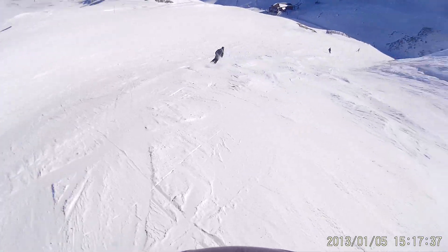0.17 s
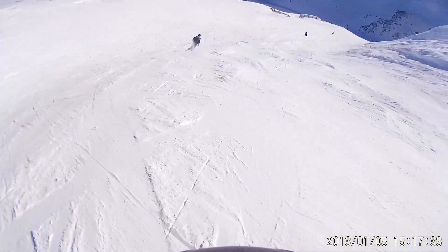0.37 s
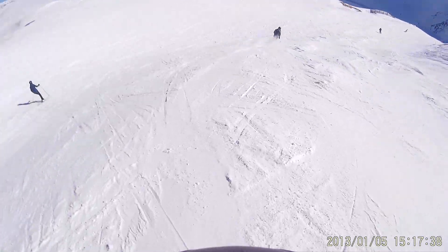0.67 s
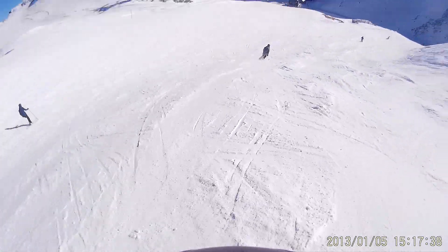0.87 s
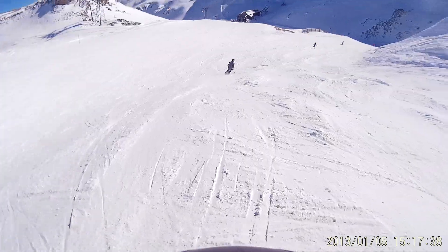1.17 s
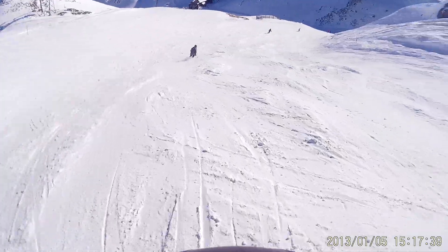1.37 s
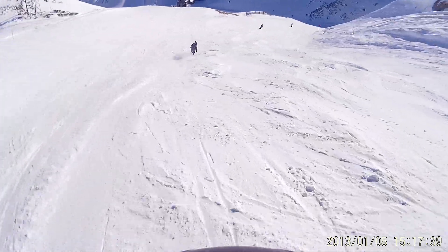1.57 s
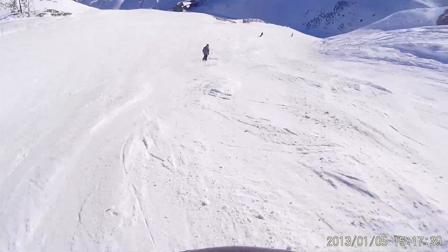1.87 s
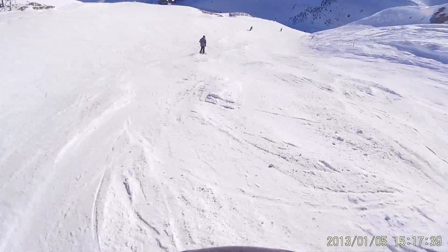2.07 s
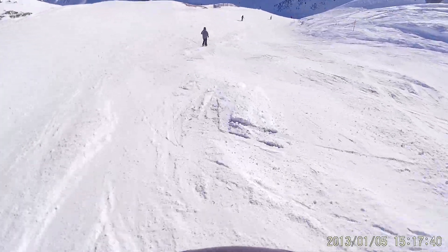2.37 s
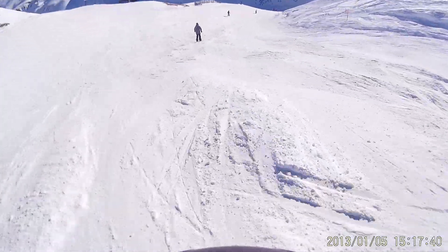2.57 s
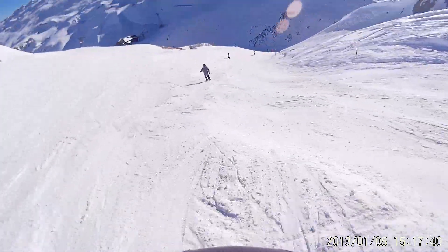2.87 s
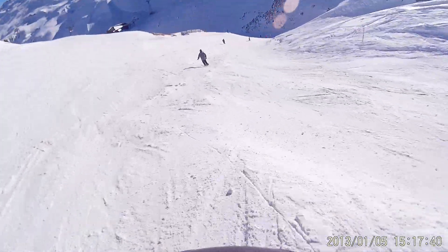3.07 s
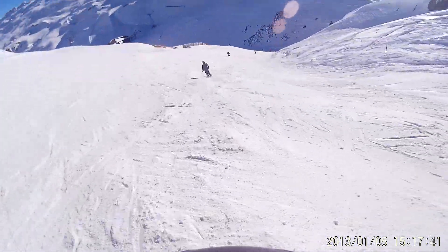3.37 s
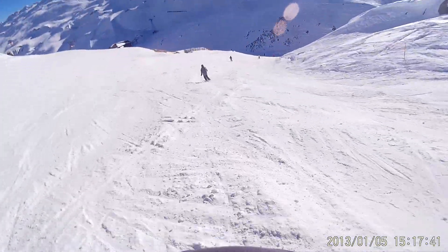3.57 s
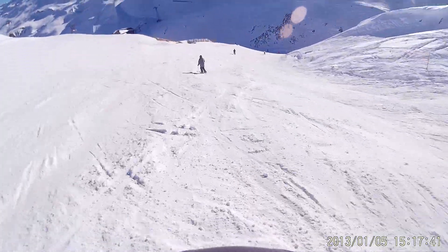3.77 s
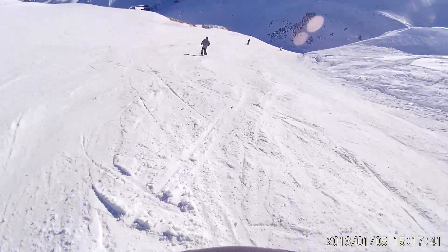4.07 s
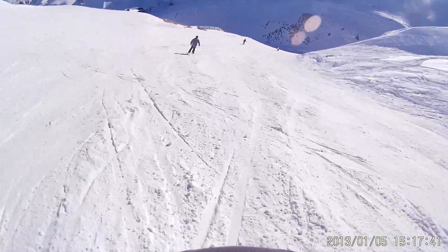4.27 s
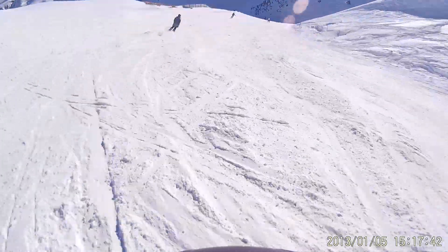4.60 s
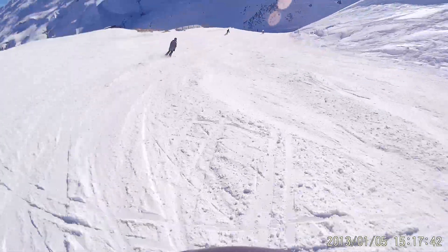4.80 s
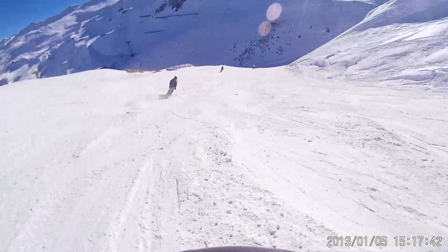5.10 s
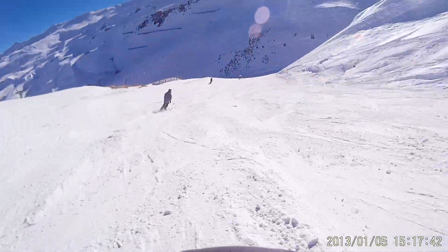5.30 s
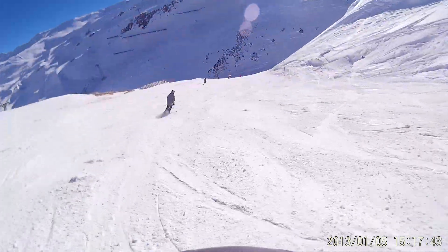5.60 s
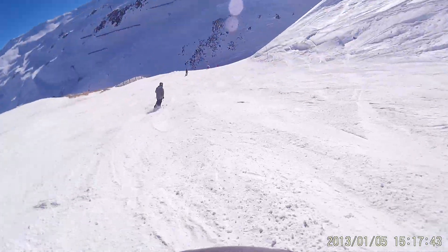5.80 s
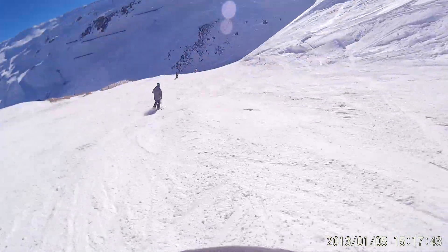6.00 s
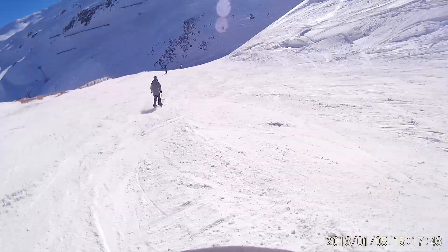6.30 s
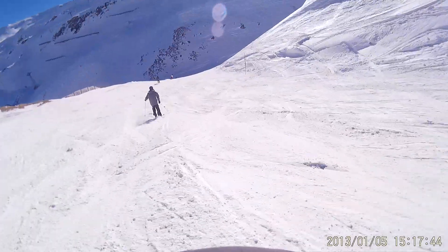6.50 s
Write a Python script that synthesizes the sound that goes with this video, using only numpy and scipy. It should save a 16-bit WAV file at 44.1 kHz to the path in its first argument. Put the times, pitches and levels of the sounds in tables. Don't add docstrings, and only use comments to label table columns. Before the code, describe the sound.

Skis gather speed on hard snow: near-quiet hiss and soft wind swell into harsh grainy scraping, low wind buffeting and sharp clicks from a plastic housing.

```python
import sys
import numpy as np
from scipy import signal
from scipy.fft import rfft, irfft
from scipy.io import wavfile
from scipy.ndimage import uniform_filter1d

SR = 44100
rng = np.random.default_rng(int(sys.argv[2]) if len(sys.argv) > 2 else 0)


def makeup_ratio(level_db):
    decades = np.asarray(level_db, float) / 20
    return 10 ** decades


def bounce(signal):
    frames = np.transpose(np.atleast_2d(signal))
    limited = np.clip(frames, -1, 1)
    pcm = np.round(limited * 32767).astype(np.int16)
    wavfile.write(sys.argv[1], SR, pcm)


N = 293265


def unit_rms(x):
    return x / np.sqrt(np.mean(x ** 2))


def coloured(points):
    hz, db = np.transpose(points)
    bins = np.maximum(np.arange(N // 2 + 1) * SR / N, 1)
    gain = makeup_ratio(np.interp(np.log(bins), np.log(hz), db))
    return unit_rms(irfft(rfft(rng.standard_normal(N)) * gain, N))


def walk(rate):
    hold = int(SR / rate)
    steps = np.repeat(rng.standard_normal(N // hold + 1), hold)
    return unit_rms(uniform_filter1d(uniform_filter1d(steps, hold), hold)[:N])


def ring(drives, modes, skirt=1):
    out = 0
    for k, (drive, (hz, width, db)) in enumerate(zip(drives, modes)):
        peak = signal.iirpeak(hz, hz / width, SR)
        band = signal.iirpeak(hz, hz / width / skirt, SR)
        rung = signal.lfilter(*band, signal.lfilter(*peak, drive))
        out = out + (-1) ** k * makeup_ratio(db) * rung
    return out


def humps(events, column=2):
    out = np.zeros(N)
    for event in events:
        centre, length = event[:2]
        first = max(int((centre - length / 2) * SR), 0)
        last = min(int((centre + length / 2) * SR), N)
        i = np.arange(first, last)
        out[i] += event[column] * np.cos(np.pi * (i / SR - centre) / length) ** 2
    return out


def swells(events, column):
    heights = [(e[0], e[1], makeup_ratio(e[column])) for e in events]
    return 20 * np.log10(humps(heights) + 1e-6)


def summed(*levels_db):
    return 10 * np.log10(sum(makeup_ratio(db) ** 2 for db in levels_db))


# time in seconds, load in dB.
LOAD = [(0, -73.5), (.3, -68.5), (.46, -77), (1.3, -65), (2.0, -62), (2.75, -52.5), (3.3, -43.5),
        (3.98, -42.5), (4.3, -35), (4.85, -37), (5.03, -43), (5.16, -35), (5.5, -32.5), (5.74, -32),
        (5.9, -41), (6.0, -34), (6.25, -33), (6.65, -38)]


def smooth_load():
    s, db = np.transpose(LOAD)
    return np.interp(np.arange(N) / SR, s, db)


# centre in seconds, length in seconds, level in dB re load.
PATCHES = [(.6, 0.14, 16.5), (.97, 0.18, 13.5), (1.14, .14, 7.5), (1.79, 0.088, 2), (2.19, 0.13, 3),
           (2.33, 0.18, 3.5), (2.47, 0.13, 5.5), (2.58, 0.19, 8), (3.25, 0.057, 1), (3.6, 0.22, 1.5),
           (3.7, 0.094, -3.5), (3.84, 0.12, 2), (4.08, 0.073, -0.5), (4.4, 0.071, 1.5), (4.54, 0.19, -3.5),
           (4.66, 0.2, 1), (4.76, .1, 1), (5.27, 0.33, -2), (5.52, .1, 1.5), (5.6, 0.056, -1),
           (6.08, 0.15, -1.5), (6.35, 0.098, -1.5), (6.5, 0.24, -1.5), (6.57, 0.044, 4)]


def load():
    return smooth_load() + humps(PATCHES)


PIVOT_DB = -38


def law(db, slope):
    return db + slope * (load() - PIVOT_DB)


# centre in seconds, length in seconds, scrape level in dB.
SCUFFS = [
    (.1, 0.96, -69.5),
    (.66, 0.47, -60),
    (.9, 0.22, -51),
    (.97, 0.14, -49.5),
    (1.13, 0.34, -55),
    (1.04, .2, -59.5),
    (1.5, 0.31, -63),
    (2.52, 0.17, -54),
]


def scuffing():
    return swells(SCUFFS, column=2)


# centre in seconds, length in seconds, buffet in dB, helmet shake in dB.
GUSTS = [(.14, 0.6, -44.5, -62), (.58, 0.18, -63, -52.5), (.67, 0.1, -47, -49), (.9, 0.21, -55, -41.5),
         (1.12, 0.21, -40.5, -45), (1.75, 0.17, -44.5, -54), (1.86, 0.25, -46.5, -55.5),
         (2.22, 0.23, -50, -53), (2.47, 0.22, -42.5, -53), (2.62, 0.28, -48, -59), (2.81, 0.11, -52, -66),
         (2.95, .14, -50, -53), (3.21, .14, -40, -56), (3.38, 0.24, -44, -50.5), (3.72, .14, -48, -50),
         (3.86, 0.2, -39, -56), (4.08, 0.26, -47, -42), (4.35, .2, -43, -56), (4.57, .14, -28.5, -47),
         (4.69, 0.2, -36, -47), (4.9, 0.23, -37, -51), (5.11, 0.13, -38, -49), (5.25, 0.13, -53, -45),
         (5.42, 0.22, -38, -47), (5.5, 0.12, -27, -44), (5.72, 0.14, -24.5, -40), (5.97, .16, -31, -44),
         (6.22, 0.28, -22.5, -37.5), (6.4, 0.27, -30, -45.5), (6.58, 0.13, -36, -55)]


def buffet():
    calm_db = -44 + 0.37 * (smooth_load() - PIVOT_DB)
    return 2.0 + summed(calm_db, swells(GUSTS, column=2))


def tones(lines):
    t = np.arange(N) / SR
    return sum(np.sqrt(2) * makeup_ratio(db) * np.sin(2 * np.pi * (hz * t + rng.random())) for hz, db in lines)


# frequency in Hz, density in dB per Hz.
HISS_COLOUR = [(300, 16), (2000, 3.5), (5000, 0), (6600, -1.5), (8800, 1), (9900, 0.5), (10600, 7),
               (11300, -0.5), (13800, -1), (14600, 4.5), (15100, 1), (15800, -6), (16500, -3)]
# frequency in Hz, level in dB.
CLOCK = [(9265, -80), (9337, -79), (9410, -76), (9483, -69.5), (9555.6, -70), (9628, -79)]
# frequency in Hz, level in dB.
WHINE = [(8387, -74), (9084, -71), (9783, -71), (10395, -72), (10482, -63), (10568, -65), (11090, -75),
         (11181, -65), (14589, -70), (14674.5, -60), (15373, -68)]


def electronics():
    floor_db = -48
    loudness_db = summed(load() + 4, scuffing(), buffet() - 3, floor_db)
    hiss_db = -67.5 + 0.58 * (loudness_db + 34)
    flicker_db = 1.06 * walk(45)
    hiss = makeup_ratio(hiss_db + flicker_db + 11.0) * coloured(HISS_COLOUR)

    start_s, length_s, period_s = 0.13, 0.19, 1.0
    busy = (np.arange(N) / SR - start_s) % period_s < length_s
    busy = uniform_filter1d(busy * 1., size=600)
    swell_db = hiss_db + 60
    clock = makeup_ratio(1.05 * swell_db + 2.5) * tones(CLOCK)
    whine_db = 0.83 * swell_db + flicker_db + 1.6 * walk(40) + 0.5
    whine = busy * makeup_ratio(whine_db) * tones(WHINE)
    noisier = makeup_ratio(1.5 * busy)
    return noisier * hiss + clock + whine


# frequency in Hz, density in dB per Hz.
BUFFET = [(2, -43), (5, 2), (12, 4.5), (22, -5), (32, -9.5), (45, -28), (70, -51), (150, -97)]
# frequency in Hz, density in dB per Hz.
HELMET = [(35, -15.5), (50, -4.5), (64, 2), (85, -7), (110, -16.5), (200, -64)]
# frequency in Hz, density in dB per Hz.
STRAP = [(70, -21), (105, -5), (140, 1), (200, -5), (300, -13), (500, -10.5), (1500, -92)]


def wind():
    shake_db = swells(GUSTS, column=3)
    helmet_db = summed(law(-52.5, 0.42), shake_db)
    strap_db = summed(law(-47.5, 0.62), shake_db - 14)
    shaken = makeup_ratio(helmet_db) * coloured(HELMET) + makeup_ratio(strap_db) * coloured(STRAP)
    pressure = makeup_ratio(buffet()) * coloured(BUFFET)
    return makeup_ratio(0.44 * walk(11)) * (pressure + shaken)


# frequency in Hz, width in Hz, level in dB.
STRUCK = [
    [(1558, 208, 7.5), (1460, 330, -6.5)],
    [(2330, 226, 4), (2880, 194, 0)],
    [(3454, 200, 7), (4190, 470, -8)],
    [(5170, 220, 2.5), (5760, 380, -6)],
    [(7230, 290, 5.5), (8900, 820, -6), (10800, 1400, -7), (11900, 1500, -13), (15200, 1900, -13)],
    [(690, 140, 3), (400, 410, 2), (990, 190, -8)],
]


def mount(events, slips, spacing_s, fade, crack_db, thud_db, cavity_db, seal_db, damping):
    out = np.zeros(N)
    chance = rng.random((len(events), 2 * slips))
    for (s, peak_db, door_db, lens_db), draw in zip(events, chance):
        gaps = spacing_s * SR * (.5 + draw[:slips])
        at = np.cumsum(gaps) - gaps[0]
        push = np.zeros(2048)
        np.add.at(push, at.astype(int), (.5 + draw[slips:]) * (-fade) ** np.arange(slips))
        seal_share_db = lens_db + seal_db
        shares_db = [cavity_db, door_db, lens_db, seal_share_db, seal_share_db + crack_db, cavity_db + thud_db]
        sound = 0
        for share_db, modes in zip(shares_db, STRUCK):
            damped = [(hz, damping * width, db) for hz, width, db in modes]
            part = ring([push] * len(modes), damped, skirt=2.3)
            sound = sound + makeup_ratio(share_db) * part / np.abs(part).max()
        i = int(s * SR)
        out[i:i + len(push)] += makeup_ratio(peak_db + 4) * sound[:N - i]
    return out


# start in seconds, peak in dB, door in dB re peak, lens in dB re peak.
TICKS = [(1.3744, -53, -6, -12), (2.085, -43, -20, -26), (2.1813, -55, -4, -3), (2.3484, -55, -2, -12),
         (3.2066, -15.5, -17.5, -14), (3.3963, -37.5, -5, -7.5), (3.7814, -17, -17, -13.5),
         (4.0131, -17, -18, -14.5), (5.0774, -16.5, -18, -13), (5.457, -20.5, -19, -13),
         (5.475, -33, 1, -12), (5.61, -19, -18, -17), (5.9383, -22.5, -8, -28), (5.9539, -19.5, -18.5, -14),
         (6.0906, -17.5, -17.5, -17), (6.2741, -16, -16, -13.5), (6.3695, -16.5, -15.5, -14.5),
         (6.4793, -20, -22, -25), (6.5685, -26, -15, -19), (6.58, -21, -12, -24.5)]


def ticks():
    return mount(TICKS, slips=1, spacing_s=.0003, fade=0.57, crack_db=-4, thud_db=-17,
                 cavity_db=-6, seal_db=-9, damping=1.0)


# start in seconds, peak in dB, door in dB re peak, lens in dB re peak.
SNAPS = [
    (2.596, -39, -2, -8.5),
    (3.0789, -32.5, -5, -6),
    (4.54, -28, -16, -4),
    (4.6095, -18.5, -9.5, -8),
    (6.3345, -29, -4, -7.5),
    (6.391, -30, -23, -11),
]


def snaps():
    return mount(SNAPS, slips=6, spacing_s=0.00043, fade=0.7, crack_db=-1, thud_db=-22,
                 cavity_db=-7, seal_db=-6, damping=1.7)


# start in seconds, peak in dB, door in dB re peak, lens in dB re peak.
KNOCKS = [
    (5.7091, -15, -4.5, -11.5),
    (6.1968, -9.5, -8, -14.5),
]


def knocks():
    return mount(KNOCKS, slips=10, spacing_s=.00045, fade=0.88, crack_db=-8, thud_db=-1.5,
                 cavity_db=-7, seal_db=-12.5, damping=1.25)


def crystals(modes, hardness_db):
    size = makeup_ratio(1.5 * rng.exponential(size=N) + hardness_db)
    return ring(size * rng.standard_normal((len(modes), N)), modes)


# frequency in Hz, width in Hz, level in dB.
BODY = [(303, 157, -10.5), (392.3, 114, -4.5), (464, 140, -16), (572, 163, -2), (650, 150, -1),
        (862, 620, -14.5), (1096, 175, -14), (1423, 260, -10.5)]
CAVITY = [(1245, 570, -10), (1492, 215, -2), (1604, 252, -2), (1827, 315, -11.5)]
DOOR = [(2314, 770, -2.5), (2630, 190, -5.5), (2900, 374, -2.5)]
LENS = [(3510, 350, 4.5), (3803, 430, 2), (4120, 280, 1.5), (4535, 830, -12)]
SEAL = [(5200, 450, 0), (5750, 700, -5)]
# frequency in Hz, width in Hz, level in dB.
CRACK = [(7400, 900, -3), (9000, 1800, -9), (10740, 900, -15), (11700, 1500, -28), (14900, 1800, -21)]
# frequency in Hz, width in Hz, level in dB.
CLASP = [(2690, 200, 3.5), (3340, 220, 1)]
# frequency in Hz, width in Hz, level in dB.
RIM = [(1610, 220, 3), (1285, 400, -7.5), (1870, 340, -20)]
# frequency in Hz, width in Hz, level in dB.
HINGE = [(4540, 570, 0)]


def skis():
    rumble_db, scuff_db = load(), scuffing()
    scrape_db = law(PIVOT_DB - 1.5, 1.06)
    bite_db = summed(law(PIVOT_DB - 10, 1.11), scuff_db - 15)

    bumps = 0.18 * walk(25)
    rumble = unit_rms(crystals(BODY, bumps + 0.91 * walk(30)))
    scrape = unit_rms(crystals(CAVITY, bumps + 1.27 * walk(45)))

    edge = bumps + 0.71 * walk(50)
    clasp_db = -6.5 + 0.9 * (summed(scrape_db, scuff_db) - rumble_db)
    bite = crystals(LENS, edge)
    bite = bite + makeup_ratio(3) * crystals(DOOR, edge)
    bite = bite + makeup_ratio(clasp_db) * crystals(CLASP, edge)
    bite = bite + makeup_ratio(-11) * crystals(SEAL, edge)
    bite = bite + makeup_ratio(-11) * crystals(CRACK, edge)

    hinge_db = -59.5 + 1.6 * (np.minimum(bite_db, -50) + 49.5)
    hinge = unit_rms(crystals(HINGE, edge))
    rim = unit_rms(crystals(RIM, edge))
    loaded = makeup_ratio(rumble_db) * rumble + makeup_ratio(scrape_db) * scrape
    edges = makeup_ratio(bite_db) * unit_rms(bite) + makeup_ratio(hinge_db) * hinge
    return loaded + edges + makeup_ratio(scuff_db) * rim


def scene():
    return (wind() + ticks() + snaps() + knocks() + skis())[None]


def top_cut(x):
    return signal.sosfilt(signal.butter(12, 16510, fs=SR, output="sos"), x)


def record(dry):
    top = signal.ellip(10, .2, 50, 15740, fs=SR, output="sos")
    mix = signal.sosfilt(top, dry + electronics())
    return top_cut(mix)


dry = scene()
out = record(dry)
bounce(out)
```